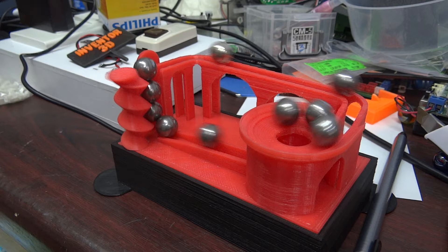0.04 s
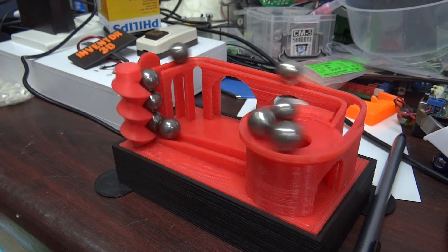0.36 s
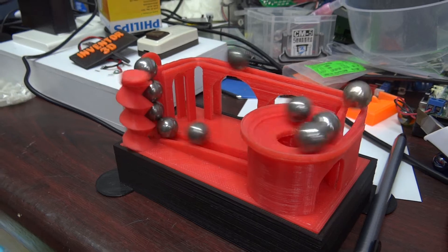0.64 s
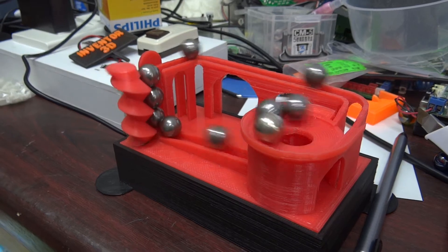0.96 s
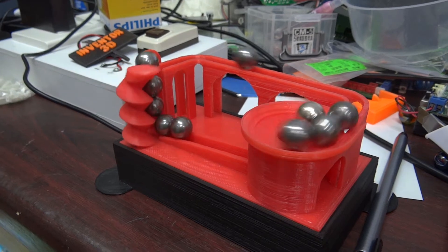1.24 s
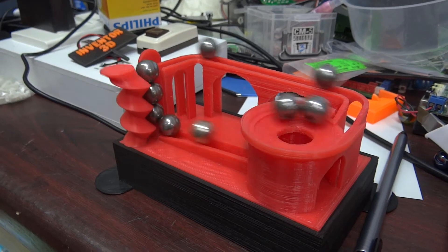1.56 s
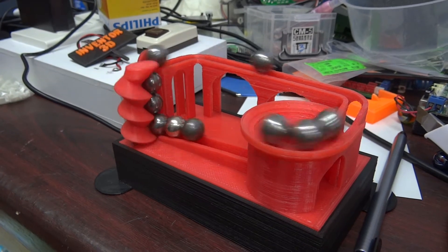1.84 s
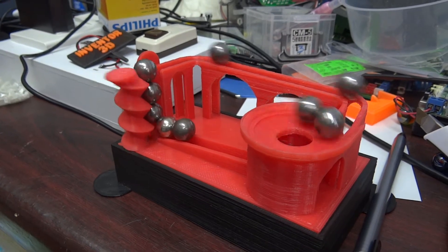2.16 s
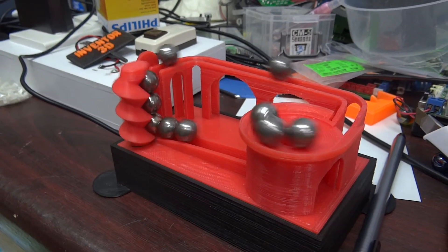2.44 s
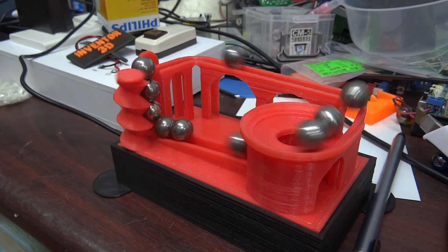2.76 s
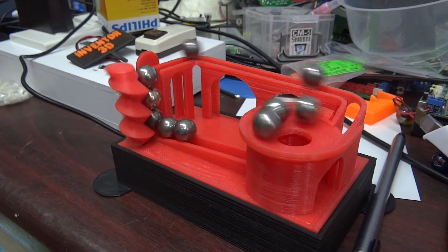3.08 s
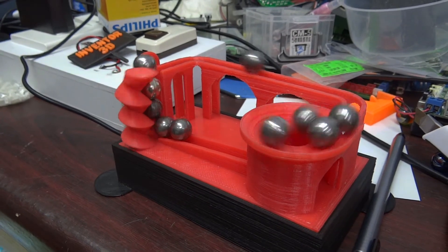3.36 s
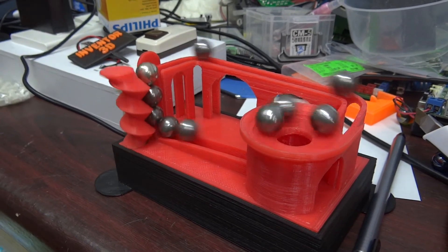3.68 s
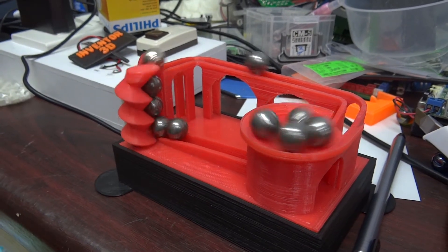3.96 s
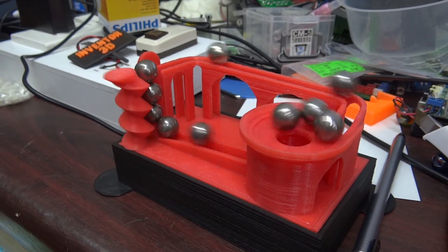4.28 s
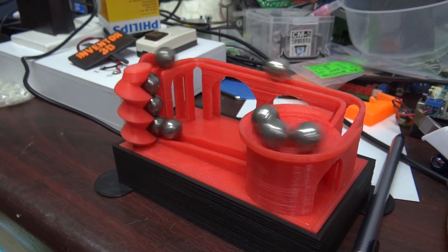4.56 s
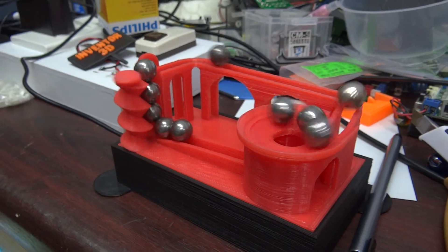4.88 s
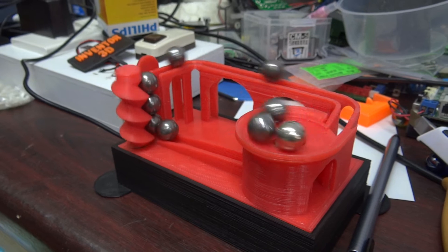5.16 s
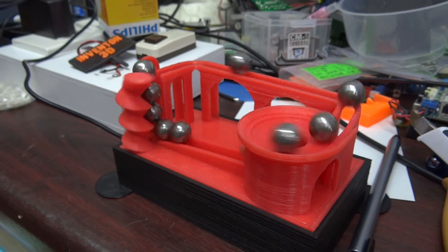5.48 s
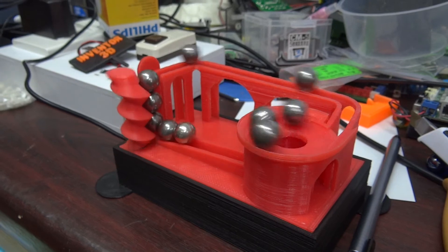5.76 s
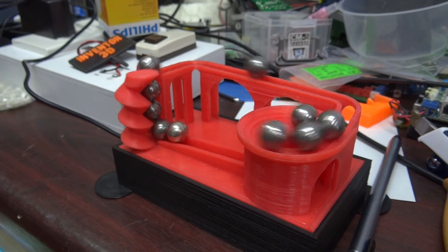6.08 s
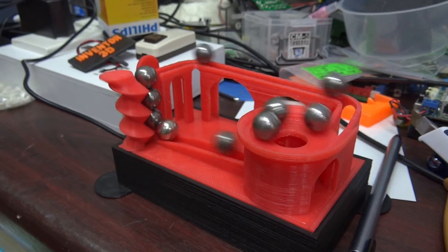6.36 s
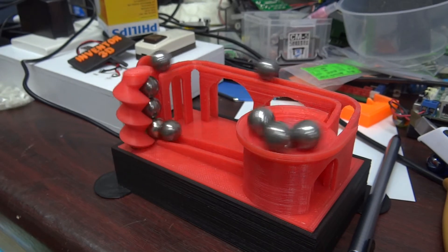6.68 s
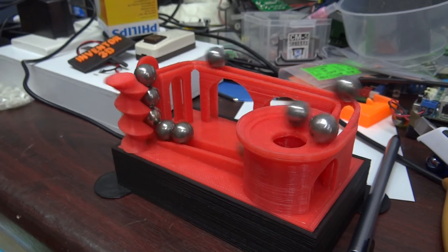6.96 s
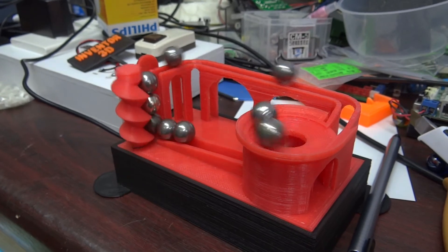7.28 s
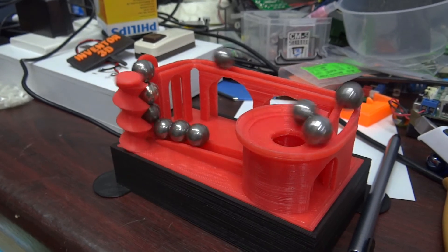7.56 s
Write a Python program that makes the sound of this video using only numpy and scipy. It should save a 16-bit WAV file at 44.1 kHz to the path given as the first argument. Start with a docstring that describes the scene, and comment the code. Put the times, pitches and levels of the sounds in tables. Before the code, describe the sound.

A small motor whines while steel balls roll, knock and clack around a plastic marble machine, close by indoors.

```python
"""A small printed-plastic marble machine runs on a desk, heard from close by.
Its geared motor whines, and sags each time the screw lifts a ball. Steel balls roll down the ridged
track and circle in the funnel, shaking the hollow base and thin walls. They knock on the body, clack
against each other and jolt the desk. Faint mains hum and room air lie underneath."""
import sys
import numpy as np
from scipy import signal
from scipy.fft import rfft, irfft
from scipy.io import wavfile
from scipy.ndimage import uniform_filter1d, minimum_filter1d

SR = 44100
rng = np.random.default_rng(int(sys.argv[2]) if len(sys.argv) > 2 else 0)


def persist_wave(psi):
    """Save psi, clipped to +-1, as 16-bit WAV."""
    counts = np.round(np.clip(psi, -1, 1) * 32767).astype(np.int16)
    wavfile.write(sys.argv[1], SR, np.atleast_2d(counts).T)


N = 336483
TIME_S = np.arange(N) / SR

# Table levels are relative; the functions set the final gains.
# Screw lifts a ball, once a turn. Each row: time in seconds, deepest sag of the tooth rate in Hz.
LIFT_SAGS = [(.37, 300), (.9, 319.6), (1.42, 320), (1.97, 370), (2.5, 380), (3.045, 410), (3.575, 331),
             (4.11, 309), (4.65, 280.6), (5.179, 316.7), (5.72, 322), (6.245, 361), (6.761, 309.3),
             (7.29, 291)]
# Load over one screw turn. Each row: offset from the lift in seconds, share of the deepest sag.
SCREW_LOAD = [(-.25, .12), (-.16, 0), (-.13, .28), (-.05, .28), (-.025, .68), (0, 1), (.045, .55),
              (.11, .17), (.155, .46), (.175, 0), (.21, .28), (.24, .06)]
# Gear whine. Each row: multiple of the tooth rate, level in dB.
WHINE_PARTIALS = [(1, -46.5), (2, -46.5), (3, -41.5), (4, -39.5), (5, -47)]
# Gear housing resonances. Each row: centre in Hz, width in Hz, lift in dB.
HOUSING_MODES = [(4840, 240, 8.5), (7130, 193, 8), (7520, 220, 7), (9000, 440, 6.5), (9440, 83, -3),
                 (10210, 120, 4)]
# Gear train hiss. Each row: frequency in Hz, density in dB.
HISS_SPECTRUM = [(200, -30.5), (550, 20), (1400, 11), (2500, 1.5), (3500, -9), (4800, 6), (6600, 5),
                 (7600, 12.5), (8800, 4), (9900, 13), (11000, 0.5), (14000, -33)]

# Hollow base under a soft blow. Each row: frequency in Hz, density in dB.
BASE_SPECTRUM = [(40, -50), (130, -25), (220, -23.5), (300, -16.5), (420, -10.5), (540, -1.14), (780, -5),
                 (1000, -1), (1250, -4.5), (2000, -35.5), (6000, -44)]
# Base resonances. Each row: centre in Hz, width in Hz, lift in dB.
BASE_RESONANCES = [(190, 31, 5.5), (271, 33, 9), (371.5, 25, 5), (537, 58, 5.5), (616.6, 25, 5),
                   (670, 100, 4), (860.5, 19, 5.5), (938, 14, 5.5)]
# Thin track and funnel walls. Each row: frequency in Hz, density in dB.
TRACK_SPECTRUM = [(100, -30.5), (600, -20.5), (1000, -8), (1230, -1.5), (1500, -2), (1950, -10), (2600, -9),
                  (3500, -28), (6000, -27.5), (11000, -31.5)]
# Wall resonances. Each row: centre in Hz, width in Hz, lift in dB.
TRACK_RESONANCES = [(1256, 27, 1.5), (1388, 70, 5), (1458, 44, 2), (1574, 20, 4), (1779, 42, 8),
                    (2365, 140, 6.5), (2982, 120, 11.5), (3300, 45, 11)]
# Steel grazing plastic. Each row: frequency in Hz, density in dB.
RATTLE_SPECTRUM = [(200, -24), (900, -4.5), (2500, 7), (3500, 5), (4200, 8.5), (5400, 4.5), (6100, 8),
                   (7200, 2), (9000, 5.5), (11000, -11.5), (14000, -17)]
# Balls circling in the funnel. Each row: time in seconds, level in dB.
FUNNEL_LEVELS = [(0, -26), (.6, -28.5), (1.2, -29), (1.6, -24), (2, -28.5), (2.58, -29.5), (2.95, -27.5),
                 (3.33, -29), (3.75, -25.5), (4.2, -38), (4.44, -31.5), (4.75, -28), (5.0, -28.5),
                 (5.55, -25), (6.02, -30.5), (6.6, -27.5), (7.4, -26.5), (7.62, -30)]
# Runs along the track. Each row: start in seconds, length in seconds, base rumble in dB, wall ring in dB.
TRACK_RUNS = [(0.072, 0.13, -30.5, -27), (0.23, 0.081, -24.5, -33), (0.309, 0.42, -23, -28.5),
              (0.831, 0.3, -23.5, -25.5), (1.251, 0.057, -25, -26), (1.363, .1, -23.5, -27.5),
              (1.469, 0.21, -21.5, -25), (1.7, .2, -36, -25.5), (2.096, .17, -22.5, -24.5),
              (2.326, 0.18, -26.5, -23), (2.659, 0.34, -24.5, -24), (3.36, 0.031, -19, -23.5),
              (3.447, 0.27, -23, -24), (3.847, 0.18, -28, -28.5), (4.025, 0.38, -23.5, -26),
              (4.475, 0.35, -24.5, -25), (4.987, 0.038, -24, -30), (5.128, 0.12, -20.5, -23.5),
              (5.297, 0.18, -25, -25), (5.494, 0.24, -27.5, -25.5), (6.058, 0.078, -22.5, -28),
              (6.164, 0.06, -24.5, -25), (6.28, 0.25, -24, -25), (6.709, 0.52, -24.5, -25.5),
              (7.24, .29, -25.5, -27)]
# A run thins out from base to walls. Each row: share of the run, then rumble, ring and rattle in dB.
RUN_BALANCE = [(0, -2, 0, 1.5), (.3, 1, -1, -2.5), (.42, 1, -1.5, -1), (.6, -3.5, 1.1, -2),
               (.82, -3.5, 2.7, -3.5), (1, -3.5, 3.5, 2.5)]
# Still room air. Each row: frequency in Hz, density in dB.
AIR_SPECTRUM = [(20, -2), (60, -7), (110, 3), (200, -2), (1000, -30), (10000, -45)]

# A ball drops or hits a wall. Each row: time in seconds, level in dB, treble offset in dB.
BALL_KNOCKS = [(0.134, -14, -12), (0.247, -10, -1), (0.331, -10.5, -1), (0.433, -20, -13),
               (0.587, -12, -16), (0.757, -7.5, -2), (0.834, -7.5, -7), (0.963, -15, -16),
               (1.383, -15, -11), (1.463, -22, -9), (1.546, -10.5, -14), (1.571, -16, -8),
               (1.591, -14, -16), (1.655, -18, -10), (1.789, -12.5, -13), (2.091, -7, -18),
               (2.338, -8.5, -4), (2.663, -8.5, 0), (2.711, -25, 1), (3.45, -9.5, 2), (3.897, -9.5, -4),
               (4.03, -13, -16), (4.102, -8.5, -4), (4.268, -13.5, -14), (4.343, -12, -20), (4.476, -11, 1),
               (4.543, -11.5, -10), (4.986, -7.5, 0), (5.21, -18, 7), (5.283, -9, -14), (5.464, -9.5, -12),
               (5.524, -22, -8), (5.907, -13, -4), (5.786, -12, -10), (6.063, -11, -10), (6.279, -11, -3),
               (6.466, -16, -15), (6.714, -10, -6), (6.974, -14, -14), (7.263, -13, -16), (7.299, -12, -10)]
# Steel on steel. Each row: time in seconds, level in dB, centre in Hz, rebound T60 in seconds.
BALL_CLACKS = [(.1755, -9.5, 7340, 0.023), (.3606, -8, 9000, 0.035), (0.393, -8, 7340, .04),
               (0.744, -11, 7400, 0.17), (0.8713, -6, 5700, 0.054), (1.0786, -7, 7440, .02),
               (1.3778, -10, 6000, .04), (1.4007, -7, 6700, 0.017), (1.5198, -7, 7300, .03),
               (1.6563, -8, 9250, 0.0079), (1.7709, -8.5, 7460, .02), (1.8476, -6, 9330, 0.018),
               (1.9363, -7.5, 6960, 0.014), (2.115, -7, 9070, 0.039), (2.4982, -9.5, 8000, 0.055),
               (2.8756, -13, 7460, 0.019), (2.935, -9.5, 7540, .03), (3, -10, 7360, .05),
               (3.3735, -11.5, 10030, .03), (3.482, -6.5, 6080, 0.036), (3.601, -11, 6000, .03),
               (3.732, -7, 6050, 0.022), (3.823, -12, 5460, 0.066), (3.856, -12.5, 3000, 0.11),
               (4.0654, -13, 4760, .02), (4.1035, -5, 6780, .03), (4.383, -6, 8540, .011),
               (4.555, -11, 5950, .06), (4.7731, -8, 9730, 0.014), (5.0164, -7, 9850, 0.0092),
               (5.17, -10, 5000, 0.061), (5.4342, -11.5, 7330, 0.049), (5.735, -5.5, 8090, .03),
               (6.072, -10, 7540, .03), (6.1215, -8, 9300, 0.01), (6.21, -8.5, 5400, .04),
               (6.278, -1, 6060, .011), (6.301, -13, 6040, 0.045), (6.495, -9, 8510, 0.012),
               (6.612, -10, 9740, 0.012), (6.713, -11, 9900, 0.019), (6.734, -6, 6470, 0.043),
               (6.8868, -6.5, 9200, 0.036), (7.1389, -6, 7490, .07), (7.281, -1, 9040, 0.0092),
               (7.301, -5, 4740, .06), (7.4954, -8, 9070, .03)]
# Drops that jolt the desk. Each row: time in seconds, level in dB.
DESK_JOLTS = [(0.409, -53), (1.559, -52), (2.829, -52), (3.374, -51), (4.382, -35), (4.772, -52),
              (5.469, -55), (6.492, -52)]
# Glancing blows that ring one wall. Each row: time in seconds, pitch in Hz, level in dB.
WALL_NOTES = [(0.41, 1756, -26.5), (0.596, 1430, -31), (2.411, 1346, -22.5), (2.712, 1760, -24.5),
              (2.786, 1400, -28), (2.908, 1340, -23), (5.147, 983, -21), (5.213, 1770, -26),
              (5.743, 1432, -23), (7.04, 1421, -25), (7.26, 1379, -22), (7.303, 1777, -32)]
# Reflections that differ left to right. Each row: frequency in Hz, level in dB re the direct sound.
SIDE_SPECTRUM = [(120, -13), (300, -16), (700, -13), (1200, -15.5), (2200, -11.5), (4500, -13.5),
                 (9000, -11.5)]


def from_db(db):
    """Decibels to gain."""
    return 10 ** (np.asarray(db) / 20)


def unit_rms(x):
    """Scale to unit rms."""
    return x / np.sqrt(np.mean(x ** 2) + 1e-20)


def curve(rows):
    """Interpolate (seconds, value) rows at every sample."""
    return np.interp(TIME_S, *np.transpose(rows))


def drift(rate_hz):
    """Smooth random motion, unit rms."""
    step, settle = 20, 4000
    pole = np.exp(-2 * np.pi * rate_hz * step / SR)
    noise = rng.standard_normal(N // step + settle + 2)
    slow = signal.lfilter([1], [1, -2 * pole, pole * pole], noise)[settle:]
    return np.interp(np.arange(N) / step, np.arange(len(slow)), unit_rms(slow))


def response(spectrum, modes=(), size=8192):
    """Minimum-phase impulse response of a body with this spectrum and these resonances."""
    hz = np.maximum(np.arange(size // 2 + 1) * SR / size, 1)
    points_hz, points_db = np.transpose(spectrum)
    db = np.interp(np.log(hz), np.log(points_hz), points_db)
    for centre_hz, width_hz, lift_db in modes:
        db += lift_db / (1 + (2 * (hz - centre_hz) / width_hz) ** 2)
    cepstrum = irfft(np.log(from_db(db)))[:size // 2]
    cepstrum[1:] *= 2
    return irfft(np.exp(rfft(cepstrum, size)))


def through(x, impulse):
    """Excite an impulse response with x."""
    return signal.fftconvolve(x, impulse)[:len(x)]


def add(out, start_s, sound):
    """Mix a sound in at start_s."""
    at = max(round(start_s * SR), 0)
    out[at:at + len(sound)] += sound[:N - at]


def tooth_rate_hz(unloaded_hz=2503):
    """Each screw turn drags the motor down in the same pattern, to its own depth."""
    sags = [(lift_s + offset_s, sag_hz * share)
            for lift_s, sag_hz in LIFT_SAGS for offset_s, share in SCREW_LOAD]
    return unloaded_hz - curve(sorted(sags))


def motor(whine_gain_db=3, strain_db=4, hiss_db=-31, throb=0.51, middle_gear_hz=14, pinion_teeth=12):
    """Gear teeth whine through the housing, louder and rougher under load; hiss throbs with the pinion."""
    tooth_hz = tooth_rate_hz()
    load = (tooth_hz.max() - tooth_hz) / np.ptp(tooth_hz)
    # off-centre middle gear binds unevenly, once a turn
    turn = np.sin(2 * np.pi * middle_gear_hz * TIME_S + 1.5 * drift(5))
    binding = np.maximum(turn, 0) ** 2 * np.abs(drift(8))
    drag = (.026 + .012 * load) * (binding - binding.mean())
    jitter = .004 * drift(50) + (.008 + .013 * load) * drift(350)
    phase = 2 * np.pi * np.cumsum(tooth_hz * (1 - drag + jitter)) / SR
    teeth = sum(from_db(db + 3.5 * drift(70)) * np.sin(k * phase) for k, db in WHINE_PARTIALS)
    housing = response([(1000, 0), (10000, 0)], HOUSING_MODES)
    whine = through(teeth * from_db(whine_gain_db + strain_db * load), housing)
    pinion_throb = 1 + throb * np.sin(phase / pinion_teeth)
    friction = rng.standard_normal(N) * pinion_throb * from_db(0.24 * drift(60))
    hiss = unit_rms(through(friction, response(HISS_SPECTRUM)))
    return whine + from_db(hiss_db) * hiss


def roll_gains(attack_s=0.018, release_s=0.043, waver_db=1):
    """Rumble, ring and rattle gains: funnel and track runs add in power."""
    funnel_db = curve(FUNNEL_LEVELS)
    powers = [from_db(funnel_db + trim_db) ** 2 for trim_db in (0, -1, -4)]
    share, *balances_db = np.transpose(RUN_BALANCE)
    for start_s, length_s, rumble_db, ring_db in TRACK_RUNS:
        t = TIME_S[:int((length_s + release_s) * SR)]
        corners_s = [0, attack_s, length_s - release_s / 2, length_s + release_s / 2]
        gate = np.interp(t, corners_s, [0, 1, 1, 0])
        rattle_db = (rumble_db + ring_db) / 2 - 3
        for power, db, balance_db in zip(powers, (rumble_db, ring_db, rattle_db), balances_db):
            gain = gate * from_db(db + np.interp(t / length_s, share, balance_db))
            add(power, start_s, gain ** 2)
    return [np.sqrt(power) * from_db(waver_db * drift(16.4)) for power in powers]


def strengths(spread_db):
    """Random impact sizes, log-normal, clipped at two sigma."""
    return from_db(spread_db * np.clip(rng.standard_normal(N), -2, 2))


def level_out(clicks, window_samples):
    """Hold the running power of a click train near one."""
    power = np.abs(uniform_filter1d(clicks ** 2, size=window_samples))
    return clicks / np.sqrt(power + 1e-9)


def bounces(per_s, uneven, spread_db):
    """A hopping ball touches down at a loosely regular rate."""
    count = np.cumsum(per_s * np.exp(uneven * drift(60))) / SR
    touches = np.diff(np.floor(count), prepend=0)
    return level_out(touches * strengths(spread_db), window_samples=4000)


def contacts(per_s, spread_db):
    """Tiny impacts, random in time, size and sign."""
    sizes = strengths(spread_db) * rng.choice([-1, 1], N)
    touches = rng.random(N) < per_s / SR
    return level_out(sizes * touches, window_samples=2600)


def flight_dip(flight_s=0.0076, dip_db=-5):
    """A ball is airborne just before each knock, so the rolling dips."""
    airborne = np.zeros(N)
    for landing_s, _, _ in BALL_KNOCKS:
        add(airborne, landing_s - flight_s, np.linspace(0, 1, int(flight_s * SR)))
    return from_db(dip_db * np.minimum(airborne, 1))


def rolling(base, track, body_gain_db=-1, base_hop=0.54, rattle_hop=0.38):
    """Balls tick over the print ridges and hop along, shaking base and track walls."""
    rumble_gain, ring_gain, rattle_gain = roll_gains()
    hops = unit_rms(bounces(per_s=66, uneven=.3, spread_db=2)
                    - bounces(per_s=84, uneven=.4, spread_db=2.5))
    # contact is firmest just after touch-down
    settling = np.exp(-TIME_S[:SR // 40] / .003)
    pressure = 1 + unit_rms(through(np.abs(hops), settling))
    base_ticks = unit_rms(pressure * contacts(per_s=2500, spread_db=2.5))
    track_ticks = unit_rms(pressure * contacts(per_s=2500, spread_db=2.5))
    rumble = rumble_gain * unit_rms(through(base_ticks + base_hop * hops, base))
    ring = ring_gain * unit_rms(through(track_ticks + hops, track))
    grazes = contacts(per_s=6000, spread_db=3) * from_db(2.8 * drift(110))
    rattle = rattle_gain * unit_rms(through(grazes + rattle_hop * hops, response(RATTLE_SPECTRUM)))
    return flight_dip() * (from_db(body_gain_db) * (rumble + ring) + rattle)


def mains_hum(hz=100, level_db=-56.5):
    """Faint hum, wavering in level and phase."""
    waver_db = 3.2 * drift(16)
    phase = 2 * np.pi * hz * TIME_S + 0.39 * drift(9.5)
    return from_db(level_db + waver_db) * unit_rms(np.sin(phase))


def room_tone(mid_db=-70, side_db=-74):
    """Very faint low rumble of air, different left and right."""
    air = response(AIR_SPECTRUM)
    mid, side = [unit_rms(through(noise, air)) for noise in rng.standard_normal((2, N))]
    return from_db(mid_db) * mid + from_db(side_db) * side * np.array([[1], [-1]])


def blow(chatter, t60_s, size=2048):
    """One impact, then a dying chatter of tiny rebounds; unit energy."""
    rebounds = rng.standard_normal(size) * from_db(-60 * TIME_S[:size] / t60_s)
    force = chatter * rebounds / np.linalg.norm(rebounds)
    force[0] = 1
    return force / np.linalg.norm(force)


def knocks(base, track, crack_gain_db=-3):
    """A falling ball thumps base and track; the hard contact adds a short rattle."""
    out, rattle = np.zeros(N), response(RATTLE_SPECTRUM)
    for start_s, db, treble_db in BALL_KNOCKS:
        thud = through(blow(chatter=1.15, t60_s=0.065), base)
        thud += through(blow(chatter=2.25, t60_s=0.066), track)
        crack = through(blow(chatter=3.2, t60_s=0.079), rattle)
        add(out, start_s, from_db(db) * thud / np.abs(thud).max())
        add(out, start_s, from_db(db + treble_db + crack_gain_db) * crack / np.abs(crack).max())
    return out


def clacks(width_hz=4500):
    """Steel on steel: a bright snap and its rebounds, scattered by the funnel walls."""
    out = np.zeros(N)
    radius = np.exp(-np.pi * width_hz / SR)
    for start_s, db, hz, t60_s in BALL_CLACKS:
        force = blow(chatter=4 + t60_s / 0.015, t60_s=t60_s, size=4096)
        resonator = [1, -2 * radius * np.cos(2 * np.pi * hz / SR), radius ** 2]
        snap = signal.lfilter([1, 0, -1], resonator, force)
        add(out, start_s, from_db(db) * snap / np.abs(snap).max())
    return out


def jolts(gain_db=-5, hz=55, t60_s=0.054):
    """The desk answers a heavy drop with a short, deep bump."""
    out, t = np.zeros(N), TIME_S[:SR // 5]
    for start_s, db in DESK_JOLTS:
        add(out, start_s, from_db(db + gain_db - 60 * t / t60_s) * np.sin(2 * np.pi * hz * t))
    return out


def wall_rings(gain_db=5, t60_s=0.17):
    """A thin wall struck at its free edge sounds one short note."""
    out, t = np.zeros(N), TIME_S[:SR // 4]
    for start_s, hz, db in WALL_NOTES:
        add(out, start_s, from_db(db + gain_db - 60 * t / t60_s) * np.sin(2 * np.pi * hz * t))
    return out


def room(direct, t60_s=0.25, common_db=-13, size=12000):
    """Faint dense reflections from desk and walls: one tail shared, one opposed left to right."""
    tails = rng.standard_normal((2, size)) * from_db(-60 * TIME_S[:size] / t60_s)
    common, side = [through(direct, tail / np.linalg.norm(tail)) for tail in tails]
    side = through(side, response(SIDE_SPECTRUM))
    return direct + from_db(common_db) * common + side * np.array([[1], [-1]])


def scene(low_cut_hz=174):
    """The machine in its room; its small body radiates no deep bass."""
    base = response(BASE_SPECTRUM, BASE_RESONANCES)
    track = response(TRACK_SPECTRUM, TRACK_RESONANCES)
    balls = rolling(base, track) + knocks(base, track) + wall_rings() + clacks()
    highpass = signal.butter(2, low_cut_hz, "high", fs=SR, output="sos")
    machine = signal.sosfilt(highpass, motor() + balls)
    return room(machine) + jolts() + mains_hum() + room_tone()


def record(dry, start_s=.082, fade_s=.003, ceiling=.58, cutoff_hz=11050):
    """Abrupt fade-in, fast peak limiter, steep low-pass."""
    sound = dry * np.clip((TIME_S - start_s) / fade_s, 0, 1)
    allowed_gain = np.minimum(1, ceiling / (np.abs(sound).max(axis=0) + 1e-9))
    gain = uniform_filter1d(minimum_filter1d(allowed_gain, size=90), size=90)
    lowpass = signal.ellip(12, .1, 90, cutoff_hz, fs=SR, output="sos")
    return signal.sosfilt(lowpass, sound * gain)


dry = scene()
out = record(dry)
persist_wave(out)
```